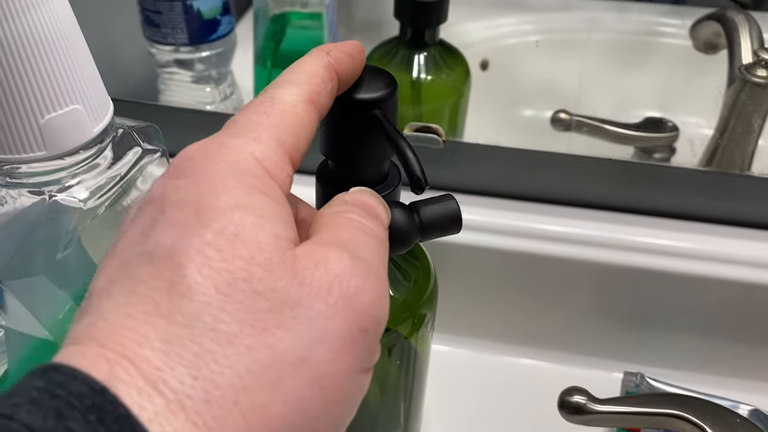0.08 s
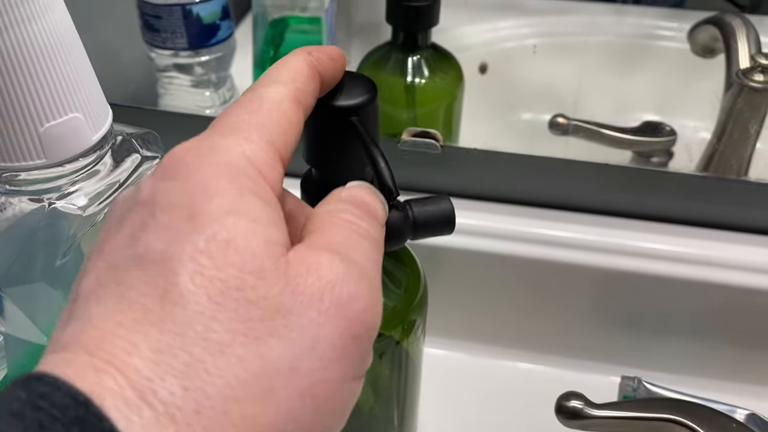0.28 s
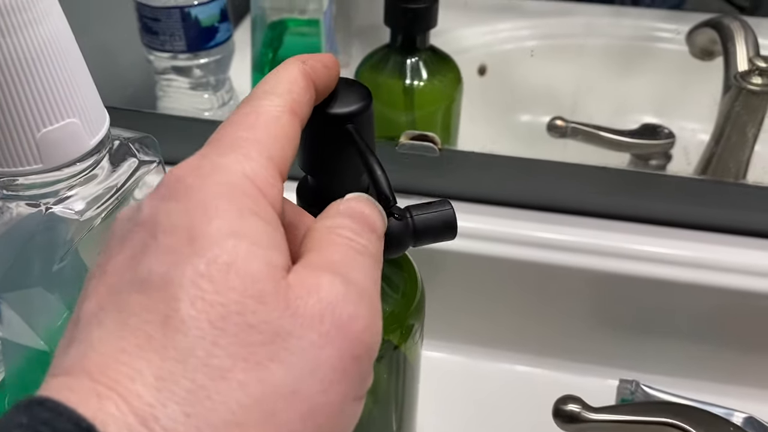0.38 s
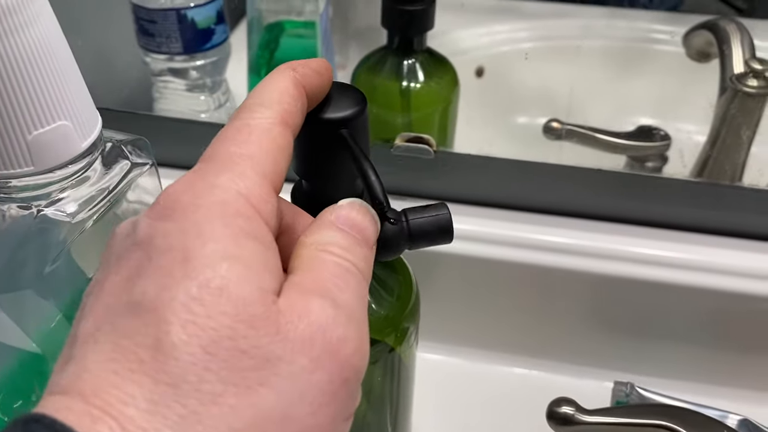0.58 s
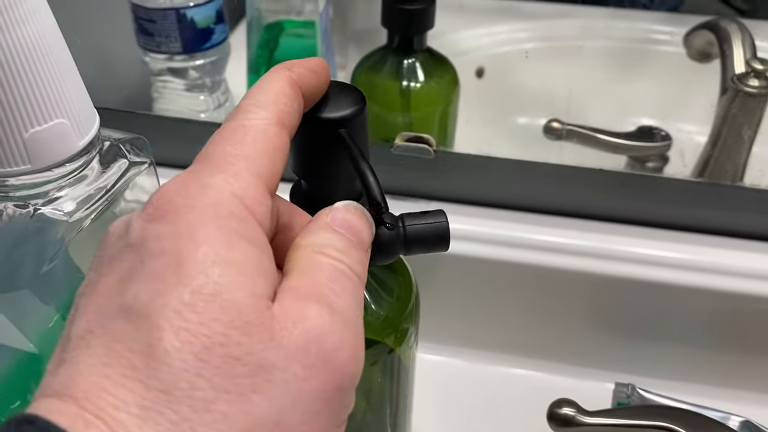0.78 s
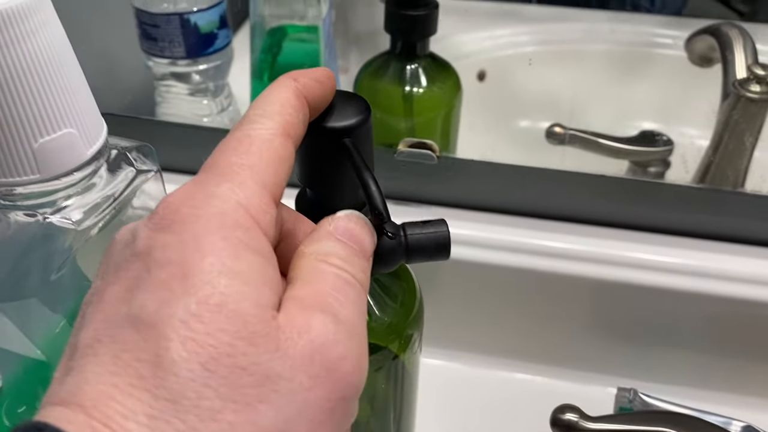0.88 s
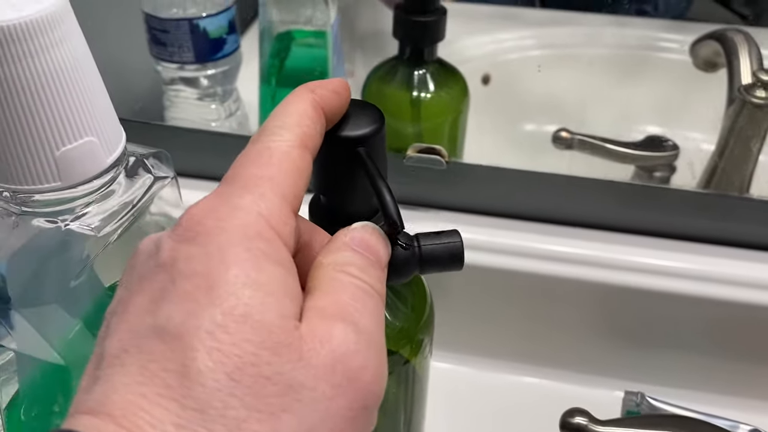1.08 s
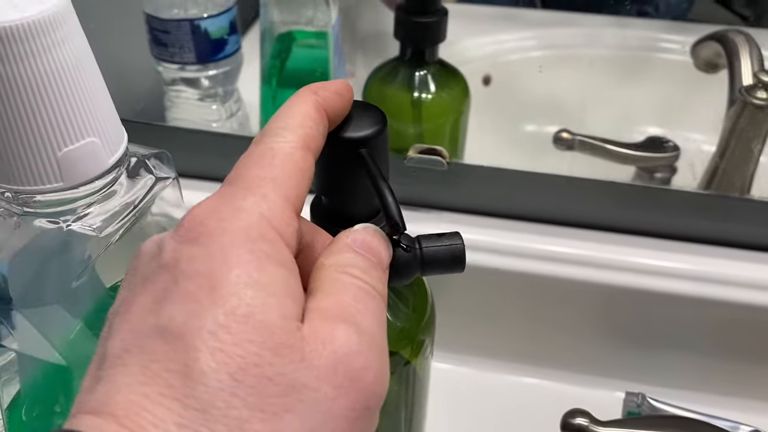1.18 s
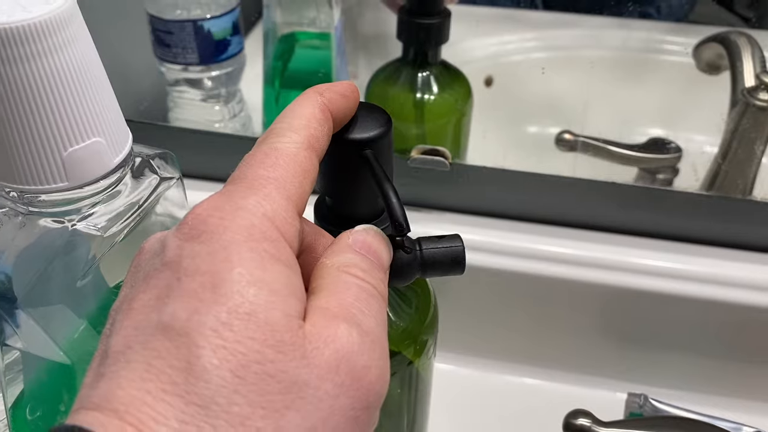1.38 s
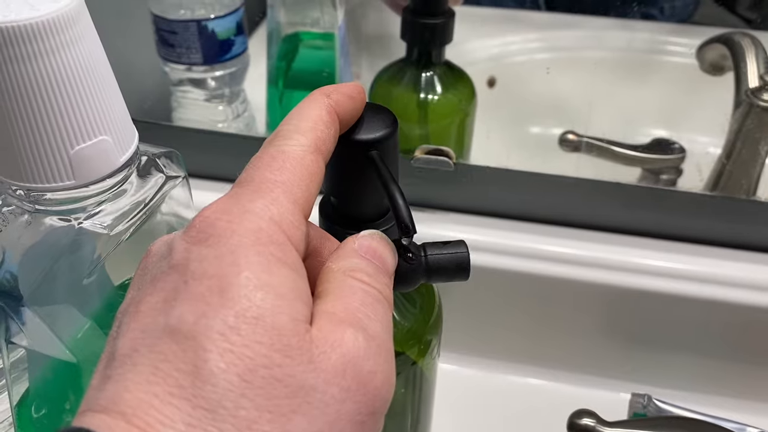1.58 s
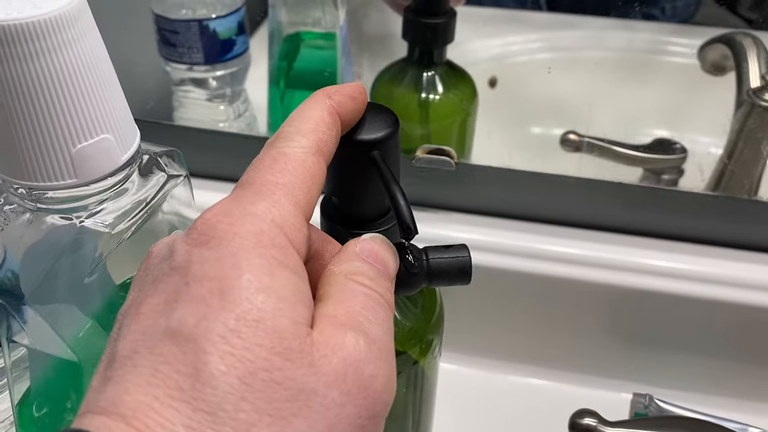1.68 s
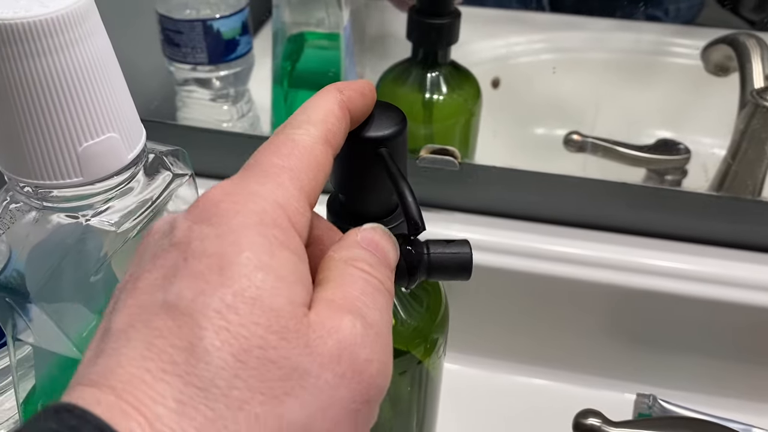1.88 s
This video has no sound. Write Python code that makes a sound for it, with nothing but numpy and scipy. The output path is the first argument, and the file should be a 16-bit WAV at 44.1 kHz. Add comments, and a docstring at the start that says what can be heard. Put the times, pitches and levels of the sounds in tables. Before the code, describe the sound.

Close up in a small hard-surfaced bathroom, a soap pump clacks once early on, thuds through the counter and echoes briefly; afterwards only a tiny air hiss, faint plastic ticks and low ventilation noise remain.

```python
"""A plastic pump on a glass soap bottle is pressed once, close to the microphone, in a small bathroom.
Over low ventilation noise and soft low and mid swells, the plunger scrapes and a light contact tick leads into
one hollow knock of decaying sines and noise. The counter thumps, surfaces repeat the knock and the room rings on.
Then the held pump gives a brief hiss of shaped noise, a faint tick, a dull settling click and two last ticks."""
import sys
import numpy as np
from scipy import signal
from scipy.fft import rfft, irfft, next_fast_len
from scipy.io import wavfile
from scipy.ndimage import map_coordinates

SR = 44100
rng = np.random.default_rng(int(sys.argv[2]) if len(sys.argv) > 2 else 0)


def dump_mix(stems):
    """Bounce the given channels to the path in sys.argv[1] as a 16-bit WAV at rate SR."""
    frames = np.atleast_2d(stems).T  # one column per channel
    limited = np.clip(frames, -1, 1)  # hard clip at full scale
    pcm = np.round(limited * 32767).astype(np.int16)
    wavfile.write(sys.argv[1], SR, pcm)


N = 83790
KNOCK_S = 0.23635


def amp(db):
    """Decibels to gain."""
    return 10 ** (np.asarray(db) / 20)


def unit(x):
    """Scale to rms 1."""
    return x / np.sqrt(np.mean(x ** 2) + 1e-20)


def along(points, hz):
    """Interpolate (frequency [Hz], value) points on a log frequency axis."""
    f, v = np.transpose(points)
    return np.interp(np.log(hz + 1), np.log(f + 1), v)


def since(start_s):
    """Seconds since start_s, zero before."""
    return np.maximum(np.arange(N) / SR - start_s, 0)


def fade(start_s, t60_s, rise_s=0.000067):
    """Struck envelope: exponential rise, then a decay of 60 dB per t60_s."""
    t = since(start_s)
    return (1 - np.exp(-t / rise_s)) * amp(-60 * t / t60_s)


def sine(hz, t, phase=0):
    """Sine at hz over the times t."""
    return np.sin(2 * np.pi * hz * t + phase)


def filtered(x, response):
    """Apply a frequency response by zero-padded FFT."""
    size = next_fast_len(N + SR // 2)
    hz = np.fft.rfftfreq(size, 1 / SR)
    return irfft(rfft(x, size) * response(hz), size)[..., :N]


def half_angle(alike, hz):
    """Half the phase angle [rad] whose cosine is the left-right likeness."""
    return np.arccos(np.clip(along(alike, hz), -1, 1)) / 2


def noise(spectrum, alike):
    """Stereo noise of rms 1 with a colour and a left-right likeness per frequency."""
    def mid_side(hz):
        angle = half_angle(alike, hz)
        return amp(along(spectrum, hz)) * [np.cos(angle), np.sin(angle)]
    mid, side = filtered(rng.standard_normal((2, N)), mid_side)
    return unit(np.array([mid + side, mid - side]))


def band(centre_hz, octaves):
    """Mono noise of rms 1 in one band, bell-shaped over log frequency."""
    def bell(hz):
        return np.exp(-0.5 * (np.log2((hz + 1) / centre_hz) / octaves) ** 2)
    return unit(filtered(rng.standard_normal(N), bell))


# pump and bottle modes before the paths: (frequency [Hz], level [dB], t60 [s])
PUMP_MODES = [(404.5, -21.5, 0.02757), (533.8, -29, 0.0701), (748, -20.5, .04), (876.5, -35, .035),
              (1205.4, -30.5, 0.073), (1386.2, -13, 0.044), (1483.4, -27, 0.086), (1666, -36, 0.082),
              (1970, -31, .05), (2785, -46.5, .1), (3540, -52, 0.0924), (4279, -48, .09), (5360, -51, .07),
              (7440, -59, 0.077)]
RING_RISE_S = 0.0007


def ring():
    """The pump and bottle ring briefly as decaying sines, damped by the hand."""
    t = since(KNOCK_S)
    return sum(amp(db) * fade(KNOCK_S, t60_s, RING_RISE_S) * sine(hz, t) for hz, db, t60_s in PUMP_MODES)


# direct path and near reflections: (delay [s], left gain [dB], right gain [dB])
KNOCK_PATHS = [(0, 1.5, -22), (.00084, -14.5, -0.5), (.00425, -9.5, -13), (.01055, -15, -19.5),
               (.01563, -30.5, -7.5), (.0285, -26, -22.5), (.0511, -26.5, -19)]
# colour of contact and crack noise: (frequency [Hz], relative density [dB])
CRACK_COLOUR = [(300, -0.5), (700, 2.5), (1500, 6), (2400, -8.5), (4200, -4), (6000, -10.5), (7500, -9),
                (8700, -27), (11000, -4.5), (15000, -17), (16500, -27.5)]
CONTACT_S, CONTACT_DB, CONTACT_T60_S, CONTACT_RISE_S = 0.2351, -35.5, 0.012, 0.0004
CRACK_DB, CRACK_T60_S, CRACK_RISE_S = -40, 0.026, 0.0013  # before the paths
# the plastic head rebounds once just after the knock; level before the paths
REBOUND_S, REBOUND_DB, REBOUND_T60_S = 0.2403, -43, 0.0074
REBOUND_HZ, REBOUND_OCTAVES = 3800, 0.55


def knock():
    """A contact tick, then crack, ring and rebound repeated by the nearest hard surfaces."""
    contact = fade(CONTACT_S, CONTACT_T60_S, CONTACT_RISE_S) * noise(CRACK_COLOUR, [(1000, 0.3)])
    crack = fade(KNOCK_S, CRACK_T60_S, CRACK_RISE_S) * noise(CRACK_COLOUR, [(1000, 0.1)])
    rebound = fade(REBOUND_S, REBOUND_T60_S) * band(REBOUND_HZ, REBOUND_OCTAVES)
    blow = ring() + amp(CRACK_DB) * crack + amp(REBOUND_DB) * rebound

    def paths(hz):
        return sum(amp([[left_db], [right_db]]) * np.exp(-2j * np.pi * hz * delay_s)
                   for delay_s, left_db, right_db in KNOCK_PATHS)
    return amp(CONTACT_DB) * contact + filtered(blow, paths)


# colour of plunger friction: (frequency [Hz], relative density [dB])
SLIDE_COLOUR = [(200, -14), (600, -2), (1400, 0), (2500, -17.5), (7000, -26), (9000, -45.5)]
SLIDE_DB, SLIDE_TAU_S = -35.5, 0.0026


def slide():
    """The plunger scrapes towards its stop: friction noise swells into the knock and dies as fast."""
    t = np.arange(N) / SR - KNOCK_S
    return amp(SLIDE_DB) * np.exp(-np.abs(t) / SLIDE_TAU_S) * noise(SLIDE_COLOUR, [(1000, 0.3)])


# counter modes under the bottle: (frequency [Hz], level [dB], t60 [s], rise [s])
COUNTER_MODES = [(130.6, -6.5, 0.0575, 0.014), (83.6, -24, .2, .03)]
THUMP_DELAY_S = 0.0019445


def thump():
    """The counter takes up the blow: low modes swell and decay as a thud."""
    t = since(KNOCK_S + THUMP_DELAY_S)
    return sum(amp(db - 60 * t / t60_s) * (1 - np.exp(-(t / rise_s) ** 2)) * sine(hz, t)
               for hz, db, t60_s, rise_s in COUNTER_MODES)


# colour of the diffuse tail: (frequency [Hz], relative density [dB])
ROOM_COLOUR = [(30, -40), (70, -4.5), (150, 1.5), (260, -20.5), (340, -5.5), (400, -3.5), (480, -3.5),
               (600, -6), (740, -4.5), (1000, -15), (1200, -7.5), (1450, -3), (1620, -20.5), (1850, -16),
               (2080, -17.5), (2350, -25), (3000, -24), (3900, -25.5), (6000, -36.5), (8500, -44),
               (12000, -42), (16000, -59.5)]
# decay of the diffuse tail: (frequency [Hz], t60 [s])
ROOM_DECAY = [(100, .42), (400, 0.2905), (1400, 0.304), (2200, 0.211), (5000, 0.17), (12000, 0.15)]
# likeness of left and right, for tail and modes: (frequency [Hz], correlation [-1..1])
ROOM_LIKENESS = [(120, 0.96), (300, .85), (560, -.4), (1400, 0.79), (5000, .1)]
ROOM_DB, ROOM_RISE_S = -30.5, 0.0041


def room():
    """The knock's diffuse tail: coloured noise, each frequency decaying at its own rate."""
    hz, t, bins = signal.stft(noise(ROOM_COLOUR, ROOM_LIKENESS), SR, nperseg=512)
    t60_s = along(ROOM_DECAY, hz)[:, None]
    decay = amp(-60 * np.maximum(t - KNOCK_S, 0) / t60_s)
    tail = signal.istft(bins * decay, SR, nperseg=512)[1][:, :N]
    return amp(ROOM_DB) * (1 - np.exp(-since(KNOCK_S) / ROOM_RISE_S)) * tail


# basin and room resonances that outlast the knock: (frequency [Hz], level [dB], t60 [s])
STANDING_WAVES = [(72.7, -41, .42), (91.74, -41.5, 0.42), (135.91, -41, .42), (335.3, -42, 0.29),
                  (450.1, -45, 0.493), (520, -50, .22), (626, -37.5, 0.18), (741.4, -40.5, .31),
                  (910, -45, .29), (1344, -33, .235), (1435.5, -38.5, 0.33), (1448.4, -31, .225),
                  (1521.5, -44.5, 0.38), (2114.2, -42, 0.16)]


def room_modes():
    """Standing waves ring on as sines, left and right out of phase as their likeness falls."""
    t = since(KNOCK_S)
    out = np.zeros((2, N))
    for k, (hz, db, t60_s) in enumerate(STANDING_WAVES):
        apart = (-1) ** k * half_angle(ROOM_LIKENESS, hz)  # alternate which side leads
        phase = np.array([[apart], [-apart]])
        out += amp(db) * fade(KNOCK_S, t60_s, ROOM_RISE_S) * sine(hz, t, phase)
    return out


# colour of air escaping from the pump: (frequency [Hz], relative density [dB])
HISS_COLOUR = [(300, -18.5), (800, 11), (1400, 4), (2200, -38.5), (4200, -13), (9000, -53), (10600, 1.5),
               (12500, -32), (16000, -32.5)]
HISS_PEAK_S, HISS_RISE_S, HISS_FALL_S, HISS_DB = 0.38, 0.0153, 0.0199, -61


def hiss():
    """A faint puff of escaping air: noise rises and falls exponentially about its peak."""
    t = np.arange(N) / SR - HISS_PEAK_S
    swell = np.exp(np.minimum(t / HISS_RISE_S, -t / HISS_FALL_S))
    return amp(HISS_DB) * swell * noise(HISS_COLOUR, [(1000, 0.24)])


# pump head modes: (frequency [Hz], level [dB], t60 [s], rise [s])
SETTLE_MODES = [(250.8, -43, 0.0214, 0.00192), (600, -49.5, 0.0074, 0.000177),
                (1205, -51.5, 0.00687, 0.0003), (4000, -64.5, 0.0016, 0.000071)]
SETTLE_S = 0.9638


def settle():
    """The pump head settles: short decaying sines make one dull little click."""
    t = since(SETTLE_S)
    return sum(amp(db) * fade(SETTLE_S, t60_s, rise_s) * sine(hz, t) for hz, db, t60_s, rise_s in SETTLE_MODES)


# ticks of the held pump: (time [s], level [dB], centre [Hz], width [octaves], t60 [s])
PUMP_TICKS = [(0.8196, -75.5, 6800, .3, 0.019), (1.8294, -68.5, 14630, .25, .008),
              (1.833, -74, 14900, 0.355, .025)]


def ticks():
    """Plastic parts shift under the finger: faint bursts of band noise."""
    return sum(amp(db) * fade(start_s, t60_s) * band(hz, octaves)
               for start_s, db, hz, octaves, t60_s in PUMP_TICKS)


# low and mid background swells: (time [s], level [dB], centre [Hz], width [octaves], half length [s])
SOFT_SWELLS = [(0.082, -56, 84, 0.44, 0.0744), (0.039, -68, 509, 0.455, 0.0575),
               (.525, -71, 588, 0.62, 0.0515), (0.641, -54, 69.2, 0.184, 0.022),
               (0.678, -59, 140.8, 0.242, 0.027), (0.697, -66.5, 442.4, 0.95, 0.0198),
               (0.777, -72, 420, 0.36, 0.025), (1.041, -70, 444.7, 0.243, 0.09),
               (1.136, -51.5, 65.84, 0.312, 0.01566), (1.329, -76, 707, 0.38, 0.039),
               (1.42, -68, 509.5, 0.391, 0.0382), (1.573, -74, 514, 0.53, 0.0245),
               (1.645, -58, 73.8, 0.45, 0.016), (1.854, -72.5, 503, 0.506, 0.0344)]


def background_swells():
    """Soft swells of low and mid noise in the background, bell-shaped in time."""
    t = np.arange(N) / SR
    return sum(amp(db) * np.exp(-((t - peak_s) / half_s) ** 2) * band(hz, octaves)
               for peak_s, db, hz, octaves, half_s in SOFT_SWELLS)


# colour of ventilation noise: (frequency [Hz], relative density [dB])
AIR_COLOUR = [(22, -24.5), (45, -7.5), (65, 1), (100, -6), (135, -2.5), (180, -14), (290, -19.5),
              (450, -18.5), (700, -24), (980, -35), (1300, -33), (1700, -35), (2400, -42.5), (6400, -44.5),
              (9000, -57.5), (11500, -51), (13500, -65), (16000, -70)]
# likeness of left and right: (frequency [Hz], correlation [-1..1])
AIR_LIKENESS = [(60, 1), (200, 0.637), (500, 0.6), (1200, 0.16), (5000, 0.14), (11000, 0.51)]
# whine bands: (centre [Hz], level [dB])
WHINE_BANDS = [(447, -75.5), (1155, -88), (1300, -84)]
AIR_DB, AIR_SWAY_DB, SWAY_POINTS_PER_S, WHINE_OCTAVES = -61, 0.5, 9, 0.032


def whine():
    """Narrow noise bands of one ventilation channel."""
    return sum(amp(db) * band(hz, WHINE_OCTAVES) for hz, db in WHINE_BANDS)


def ventilation():
    """A rumble whose level sways gently at random, plus steady whine independent left and right."""
    sway = map_coordinates(rng.standard_normal(64), [np.arange(N) / SR * SWAY_POINTS_PER_S], mode="wrap")
    rumble = amp(AIR_DB + AIR_SWAY_DB * sway) * noise(AIR_COLOUR, AIR_LIKENESS)
    return rumble + np.array([whine(), whine()])


def scene():
    """One pump stroke in the bathroom, then the held pump, over ventilation."""
    stroke = slide() + knock() + thump() + room() + room_modes()
    return stroke + settle() + ticks() + hiss() + background_swells() + ventilation()


TOP_HZ = 16200


def record(dry):
    """The recorder keeps nothing above its band limit."""
    return filtered(dry, lambda hz: hz < TOP_HZ)


dry = scene()
out = record(dry)
dump_mix(out)
```